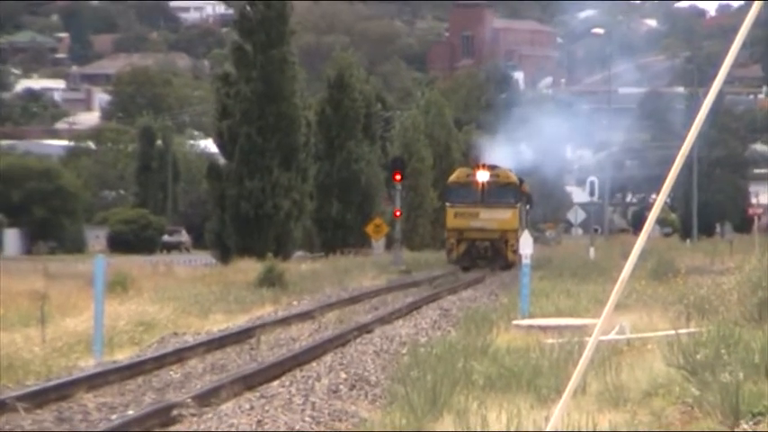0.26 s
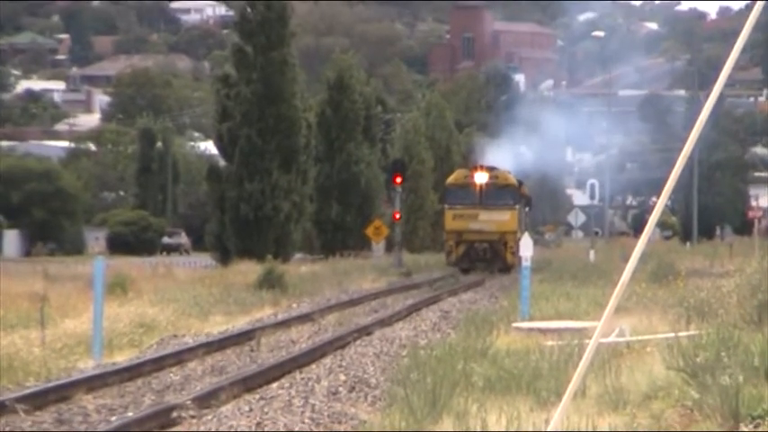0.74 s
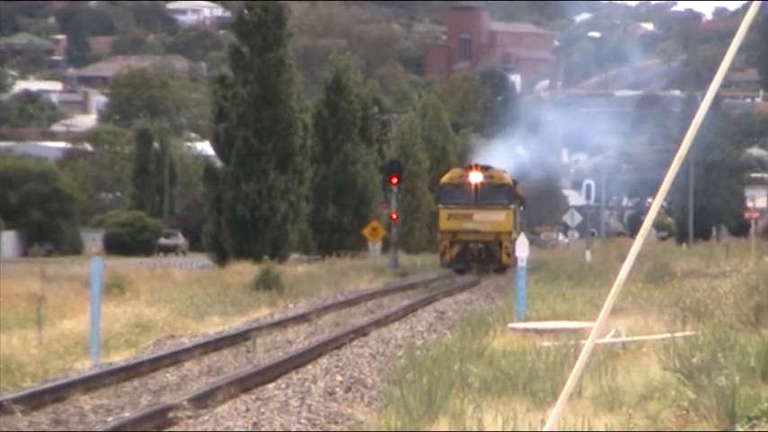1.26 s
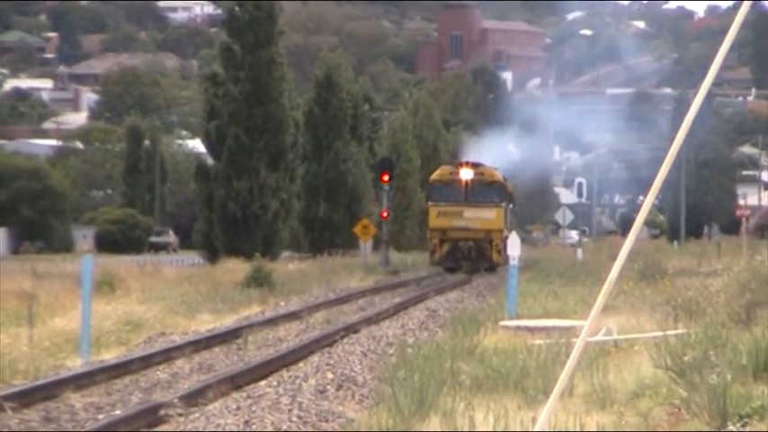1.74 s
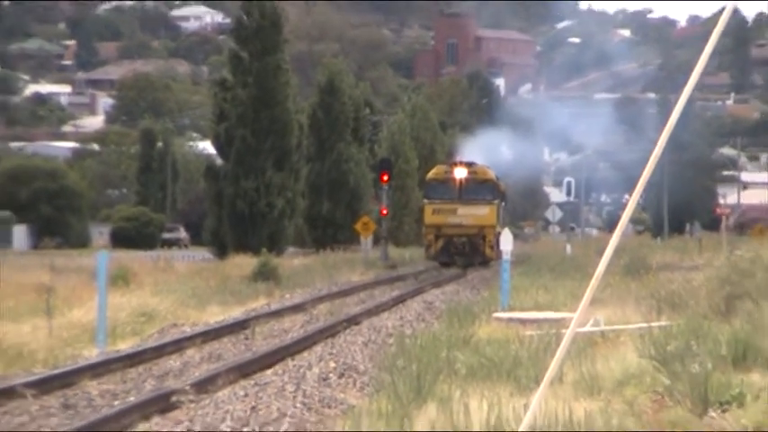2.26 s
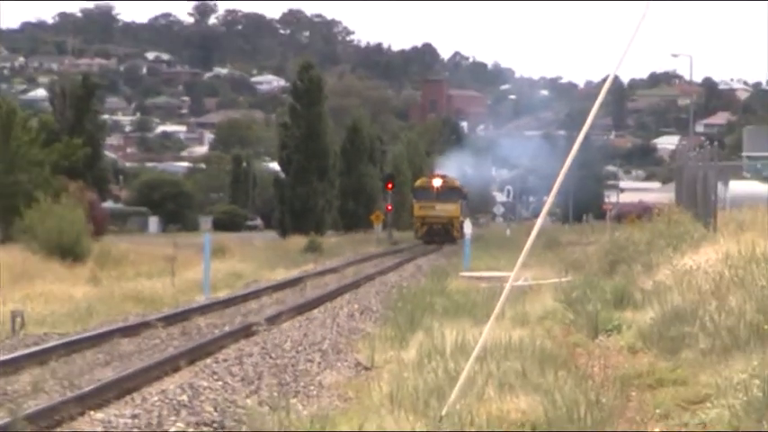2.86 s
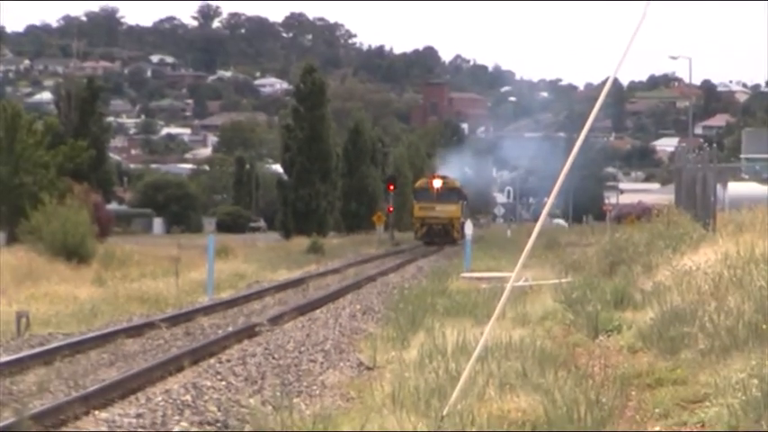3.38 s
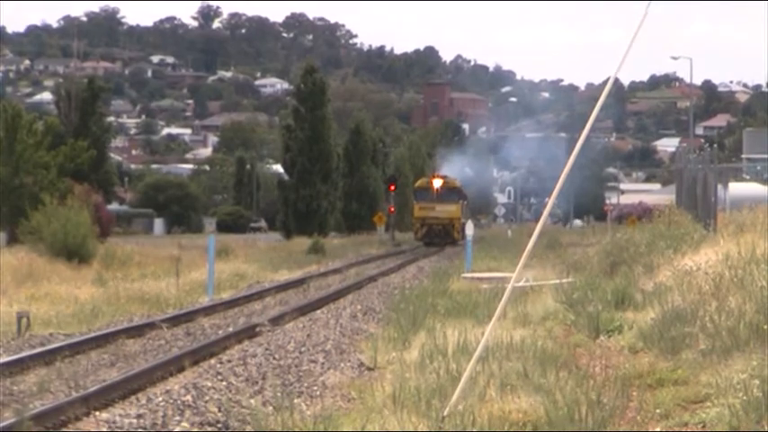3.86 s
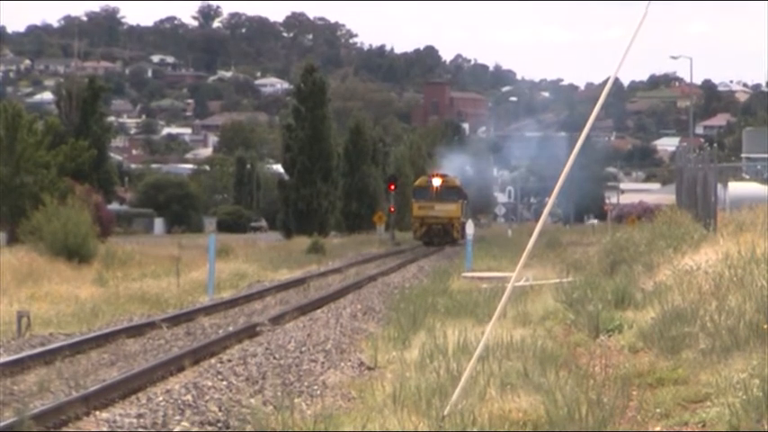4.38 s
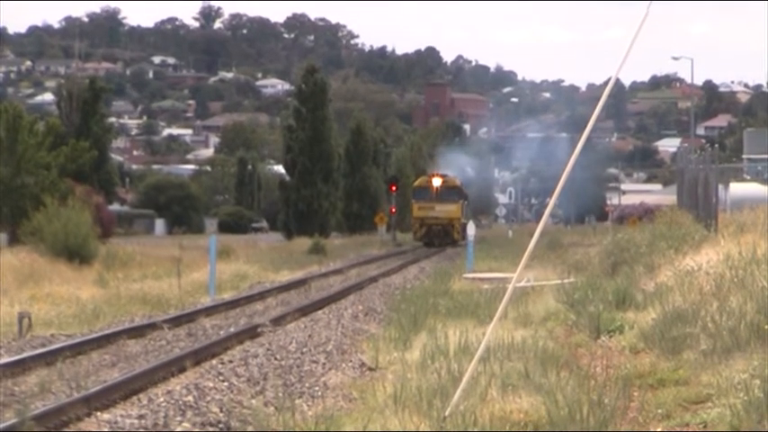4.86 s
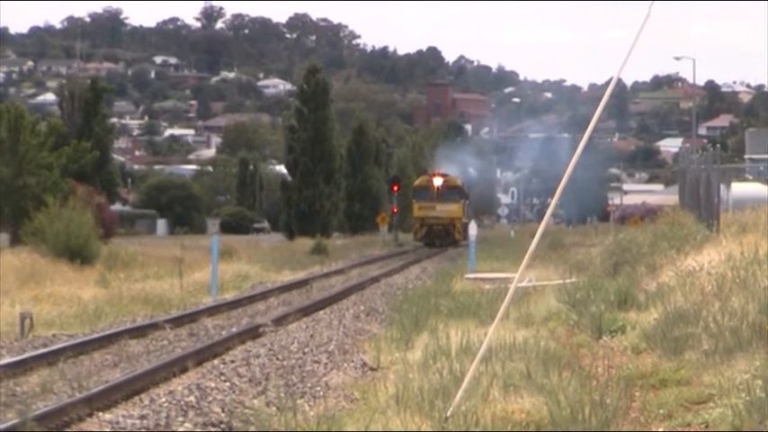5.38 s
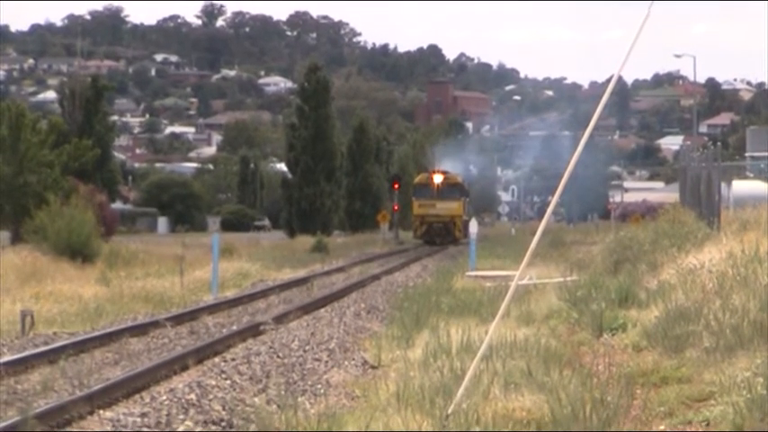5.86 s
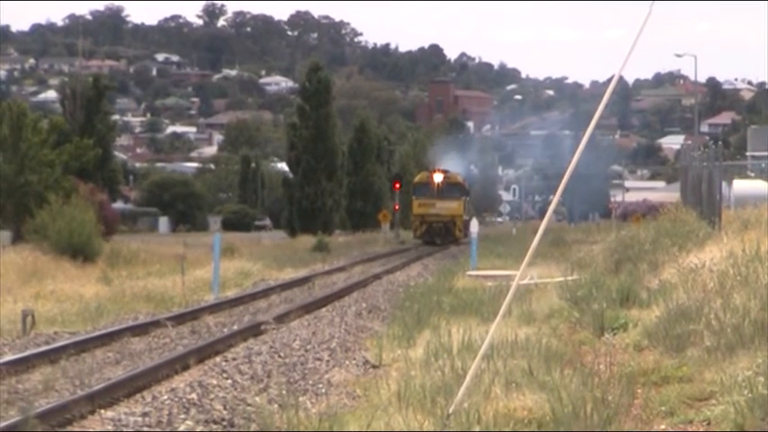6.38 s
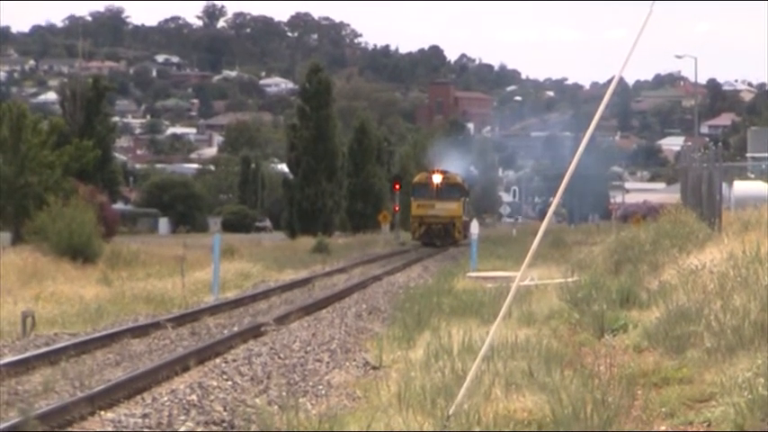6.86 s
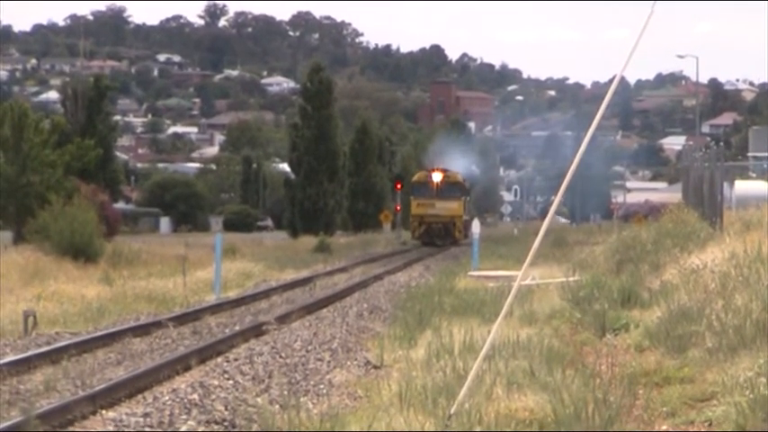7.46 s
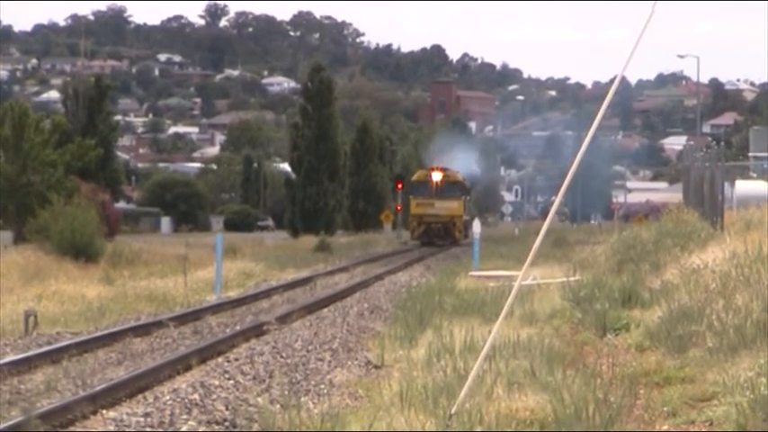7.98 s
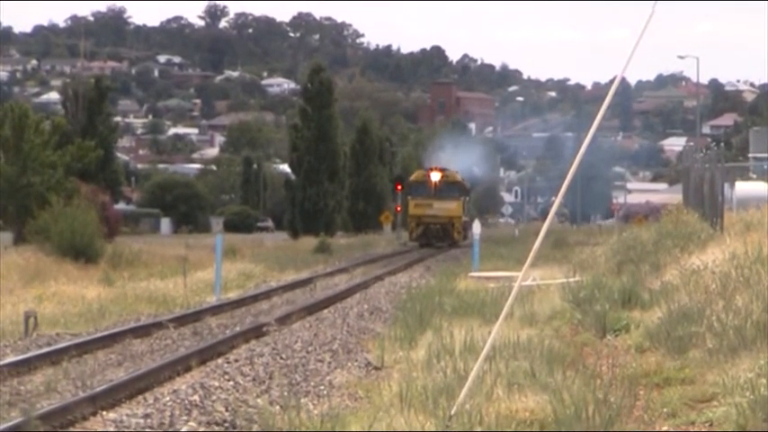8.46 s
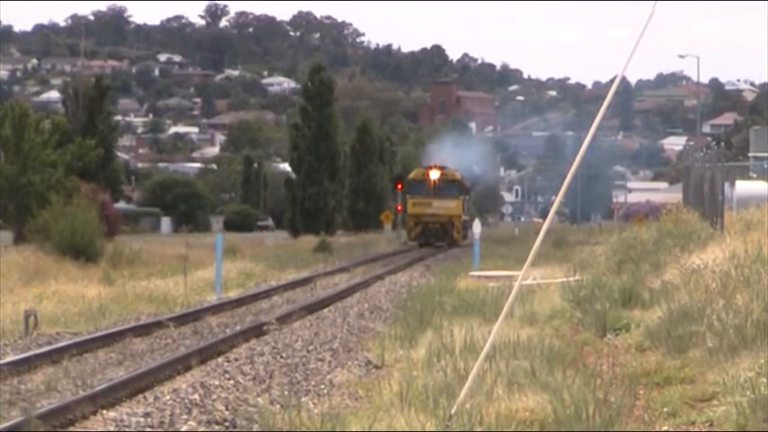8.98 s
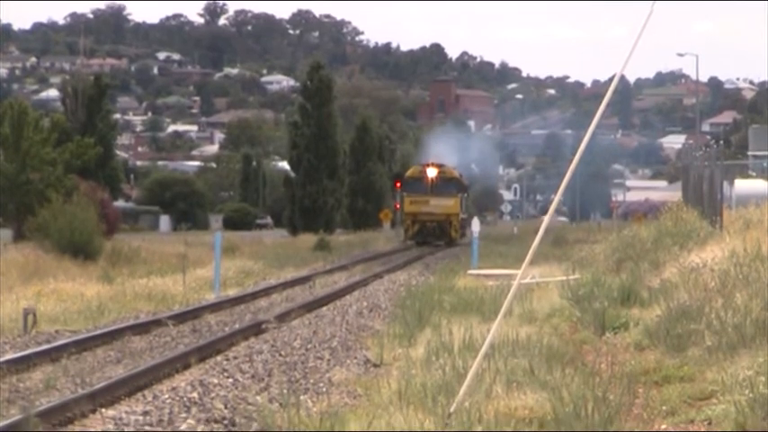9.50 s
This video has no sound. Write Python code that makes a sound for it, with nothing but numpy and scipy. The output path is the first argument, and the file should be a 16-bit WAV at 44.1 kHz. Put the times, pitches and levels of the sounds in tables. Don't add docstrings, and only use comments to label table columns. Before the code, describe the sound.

Faint insect chirring and light wind, then a growing throbbing diesel roar, broken by a single second-long chordal train horn and short echoes.

```python
import sys
import numpy as np
from scipy import signal
from scipy.io import wavfile
from scipy.ndimage import uniform_filter1d

SR = 44100
rng = np.random.default_rng(int(sys.argv[2]) if len(sys.argv) > 2 else 0)


def to_wav(sig):
    pcm = np.clip(np.atleast_2d(sig), -1, 1) * 32767
    pcm = np.round(pcm).astype(np.int16)
    wavfile.write(sys.argv[1], SR, pcm.T)


def volts_from_db(level):
    exponent = np.asarray(level, float) / 20
    return 10 ** exponent


N = 429093


def in_time(rows):
    s, *columns = np.transpose(rows)
    return [np.interp(np.arange(N) / SR, s, c) for c in columns]


def at_hz(points, hz, column=1):
    points = np.array(points)
    return np.interp(np.log(hz), np.log(points[:, 0]), points[:, column])


def rms_one(x):
    return x / np.sqrt(np.mean(x ** 2) + 1e-20)


def drift(rate):
    r = np.exp(-80 * np.pi * rate / SR)
    coarse = rng.standard_normal(N // 40 + 2002)
    slow = signal.lfilter([1], [1, -2 * r, r * r], coarse)[2000:]
    return np.interp(np.arange(N) / 40, np.arange(len(slow)), rms_one(slow))


def pan(x, left_db, count=2):
    left, right = x * volts_from_db(np.array([[left_db], [-left_db]]) / 2)
    return np.array([left, np.roll(right, count)])


def noise(colour, low_hz, high_hz, patchy_db, count=2):
    # f/Hz, likeness when far (-1 to 1), likeness when near
    likeness = [(30, -.3, .3), (60, .1, .8), (120, .55, .85), (300, .65, .92), (1000, .6, .9),
                (2000, .5, .87), (4000, .6, .65), (8000, .5, .75), (12000, .5, .85), (15500, .4, .8)]
    # f/Hz, left minus right/dB
    balance = [(60, -1), (110, -9), (200, -0.5), (380, -1.5), (700, -1.5), (1290, -1), (2380, -0.5),
               (4400, 0.5), (8120, 1.5), (15000, -5.5)]
    bands = int(np.ceil(4 * np.log2(high_hz / low_hz)))
    edges = np.geomspace(low_hz, high_hz, bands + 1)
    near = (np.arange(N) / N) ** 2
    white, out = rng.standard_normal((2, 2, N)), 0
    for k, (low, high) in enumerate(zip(edges, edges[1:])):
        band = signal.butter(2, [low, high], "band", fs=SR, output="sos")
        mid, side = signal.sosfilt(band, white[k % 2])
        hz = np.sqrt(low * high)
        alike = at_hz(likeness, hz) * (1 - near) + at_hz(likeness, hz, column=2) * near
        alike = np.clip(alike, -1, 1)
        pair = np.sqrt(1 + alike) * mid + np.sqrt(1 - alike) * side * [[1], [-1]]
        sides = volts_from_db(at_hz(balance, hz) / 2 * np.array([[1], [-1]]))
        out = out + volts_from_db(at_hz(colour, hz) + patchy_db * drift(6.5)) * pair * sides
    out = pan(out, 0, count=count)
    return out / np.sqrt(np.mean(out.mean(axis=0) ** 2))


def roar_rise():
    # t/s, level/dB
    loudness = [
        [(0, -55), (1.6, -54.5), (2.2, -52), (3.6, -47.5), (4.8, -45), (6.28, -41.5)],
        [(7.75, -32.5), (8.2, -33), (9.0, -30.5), (9.73, -30)],
    ]
    return in_time(loudness[0] + loudness[1])[0] + 52


def wind():
    # t/s, level/dB
    gusts = [(0.0, -37), (0.24, -60), (0.54, -33.5), (0.68, -48), (1.49, -43.5), (1.51, -47), (5.39, -50),
             (5.44, -59), (5.5, -47.5), (7.83, -45), (9.68, -47), (9.73, -31)]
    # f/Hz, level/dB per Hz
    rumble_colour = [(8.8, -45), (15, -19), (54, -5.5), (81, -11.5), (89, -12), (95, 0), (120, -30),
                     (210, -120)]
    return volts_from_db(in_time(gusts)[0]) * noise(rumble_colour, 13, 89.7, patchy_db=-1.0)


def song(hz, width_hz, steady=1.9):
    turn = 2 * np.pi * np.cumsum(hz * np.ones(N)) / SR
    return rms_one((steady + drift(width_hz)) * np.cos(turn) + drift(width_hz) * np.sin(turn))


def insects():
    # t/s, level/dB
    swell = [
        [(0.0, -58), (2.29, -48), (2.9, -47), (3.92, -45.5), (6.28, -44.5)],
        [(7.6, -43.5), (7.84, -41), (8.2, -43), (8.21, -41.5), (9.73, -40)],
    ]
    # f/Hz, level/dB per Hz
    chorus_colour = [(1590, -43), (2700, -13), (2890, -13), (2950, -9.5), (3330, -10), (3520, -1.5),
                     (3680, -1), (3780, -21.5), (4720, 3), (5160, -10.5), (5710, -16.5), (5900, -18),
                     (7670, -48), (13000, -120)]
    # t/s, song f/Hz, level/dB
    nearest = [(0, 3520, -64), (1.2, 3510, -65.5), (2.2, 3570, -45.5), (3.0, 3560, -50),
               (3.43, 3540, -46.5), (4.49, 3550, -40), (4.75, 3560, -52), (5.1, 3580, -46),
               (6.07, 3590, -41.5), (6.28, 3570, -63)]
    # t/s, song f/Hz, level/dB
    neighbour = [(0, 4714, -51), (.9, 4680, -59), (1.6, 4680, -64), (4.3, 4720, -45), (6.28, 4690, -46)]
    # song f/Hz, width/Hz, level/dB, left minus right/dB
    choir = [(3030, 6.6, -57.5, 2), (3060, 23, -56, 1), (3264, 28, -56, -3), (3380, 8.2, -52.5, 10),
             (3625, 8.9, -63, -7), (3810, 11, -59.5, 1), (3960, 13, -57, -4), (4125, 22, -52.5, -8),
             (4280, 5.9, -58.5, -1), (4580, 20, -52.5, -1), (4890, 27, -57, -8), (5080, 12, -56.5, -6),
             (5200, 13, -73, -6), (5430, 8.7, -58.5, 6), (5700, 16, -64.5, 12)]
    chorus_db, = in_time(swell[0] + swell[1])
    out = volts_from_db(chorus_db - 0.5) * noise(chorus_colour, 2810, 5620, patchy_db=0.6)
    hz, db = in_time(nearest + [(7.6, 3500, -50)])
    whine = volts_from_db(db - 4) * song(hz, 35, steady=2.4)
    overtone = volts_from_db(db - 19) * song(1.9 * hz, 200, steady=0)
    out += pan(whine + overtone, .6)
    hz, db = in_time(neighbour + [(7.6, 4890, -51)])
    out += pan(volts_from_db(db - 4) * song(hz, 130, steady=.3), -1)
    swell_db = np.minimum(chorus_db + 43.5, 0)
    for hz, width_hz, db, left_db in choir:
        level = volts_from_db(db + swell_db - 5 + 3.6 * drift(1.3))
        out += pan(level * song(hz * (1 + .003 * drift(.5)), 1.8 * width_hz, steady=1.2), left_db)
    return out


def leaves():
    # t/s, level/dB
    gusts = [(0, -76.5), (1.9, -74.5), (4.1, -71.5), (5.6, -70), (6.0, -66.5), (6.4, -67.5), (7.07, -66),
             (7.34, -64), (7.53, -64.5), (8.0, -59.5), (8.37, -65), (8.65, -59.5), (9.25, -63.5),
             (9.55, -56), (9.73, -57)]
    # f/Hz, level/dB per Hz
    leaf_colour = [(3290, -31), (5600, -1), (6100, -5), (8020, -11.5), (9270, -11), (15600, -41)]
    hiss_db, = in_time(gusts)
    top_db = -69.5 + .75 * np.maximum(hiss_db + 68, 0)
    top_db += .55 * np.maximum(roar_rise() - 10, 0)
    out = volts_from_db(hiss_db + 7.0) * noise(leaf_colour, 6150, 10960, patchy_db=0.9, count=1)
    return out + volts_from_db(top_db - 10.5) * noise(leaf_colour, 10800, 15700, patchy_db=.7)


def chips():
    # t/s, length/s, from f/Hz, to f/Hz, level/dB
    whistles = [(0.124, 0.058, 6100, 6150, -47.5), (.175, 0.046, 5830, 6260, -56),
                (.16, .025, 7200, 7200, -61), (0.706, .025, 5600, 5060, -55),
                (1.035, 0.046, 3400, 3080, -50), (1.245, 0.039, 5650, 5350, -56),
                (1.445, 0.045, 2970, 3530, -48), (2.007, .035, 5800, 5550, -52),
                (5.359, 0.033, 5920, 5740, -49), (7.557, 0.16, 1280, 1330, -38),
                (8.29, .05, 6200, 6100, -47)]
    out = np.zeros((2, N))
    for s, length, from_hz, to_hz, db in whistles:
        size = round(length * SR)
        glide_hz = np.linspace(from_hz, to_hz, size)
        tone = np.sin(2 * np.pi * np.cumsum(glide_hz) / SR) * np.hanning(size) ** .5
        rasp = uniform_filter1d(rng.standard_normal(size), size=60) * np.sqrt(20)
        tone *= 1 + (abs(to_hz - from_hz) > 250) * rasp
        left_db = -5.5 if s < .3 else -.5
        out[:, round(s * SR):][:, :size] += pan(np.sqrt(2) * volts_from_db(db) * tone, left_db)
    return out


def ticks():
    # t/s, peak level/dB, centre f/Hz, width/Hz, time to fall by 60 dB/s
    knocks = [(1.94, -40, 7000, 5000, .04), (3.352, -40, 9000, 9000, .012), (3.3705, -24, 3950, 450, .05),
              (3.3705, -31, 7000, 5500, .07), (3.610, -27, 520, 400, .15), (3.962, -50, 9000, 6000, .01),
              (3.974, -35, 11000, 8000, .02), (4.015, -50, 9000, 6000, .015), (9.195, -16, 900, 700, .03)]
    # t/s, left minus right/dB
    places = [(3.3, -1), (3.36, -5), (3.7, -2), (3.96, 3), (4.1, -1.5)]
    out, size = np.zeros((2, N)), 4000
    for s, db, hz, width_hz, t60 in knocks:
        left_db = np.interp(s, *np.transpose(places))
        shared, *own = rng.standard_normal((3, size))
        edges = [max(hz - width_hz / 2, 50), hz + width_hz / 2]
        band = signal.butter(2, edges, "band", fs=SR, output="sos")
        fade = volts_from_db(-60 * np.arange(size) / SR / t60)
        burst = signal.sosfilt(band, (shared + 0.56 * np.array(own)) * fade)
        out[:, round(s * SR):][:, :size] += pan(volts_from_db(db) * burst / np.abs(burst).max(), left_db)
    return out


def crank_angle():
    # t/s, turns per s/Hz
    speed = [(0, 14.12), (3, 14.2), (5.5, 14.29), (7.5, 14.27), (8.5, 14.17), (9.2, 14.05), (9.73, 13.96)]
    return 2 * np.pi * (np.cumsum(in_time(speed)[0]) / SR + .3)


def roar(crank):
    # f/Hz, level/dB per Hz
    roar_colour = [(53, -33), (90, -2.5), (128, -7), (182, -4.5), (230, -8.5), (274, -16.5), (445, -16.5),
                   (547, -19.5), (643, -22.5), (801, -16.5), (984, -23), (1380, -22), (1990, -23),
                   (2670, -28), (3000, -27), (3900, -57), (6600, -120)]
    # low f/Hz, high f/Hz
    registers = [
        (90, 280),
        (280, 700),
        (700, 1400),
        (1400, 2800),
    ]
    # level when far/dB, share of the rise
    register_gain = [(-46, 0.43), (-51.5, 0.69), (-51.5, 0.84), (-54.5, 0.82)]
    # t/s, rise/s, length/s, level/dB
    surges = [
        (4.9, .15, 0.58, 2),
        (9.047, 0.28, 1.1, 5.5),
    ]
    surge_share = (0.031, 0.81, 1.08, -0.031)
    t, rise_db, surge_db, out = np.arange(N) / SR, roar_rise(), 0, 0
    for s, rise, length, db in surges:
        surge_db = surge_db + db * np.clip(np.minimum(t - s, s + length - t) / rise, 0, 1)
    for (low_hz, high_hz), (db, share), part in zip(registers, register_gain, surge_share):
        level = volts_from_db(db + share * rise_db + part * surge_db)
        out = out + level * noise(roar_colour, low_hz, high_hz, patchy_db=.9)
    return out * (1 + 0.02 * np.cos(crank) + 0.077 * np.cos(8 * crank))


def exhaust(crank):
    # t/s, level/dB
    approach = [(0, -52.5), (1.5, -52.5), (3, -49.5), (4.4, -47.5), (5.3, -43), (6.3, -40.5), (7.0, -39),
                (7.6, -36), (8.2, -34), (9.0, -30.5), (9.73, -29.5)]
    # t/s, level over the leader/dB
    trailing = [(0, -6), (2.5, -2.5), (3.3, -9), (4.4, -1.5), (7.1, -2), (7.6, -12), (9.73, -20)]
    # t/s, firings behind (the tones add up at whole numbers)
    slip = [(0, -2.4), (1.33, 0), (2.27, 2), (2.9, 3), (4.45, 6), (5.83, 8), (7.33, 11), (9.73, 16)]
    # level over the loudness when far/dB, share of its rise, trailing engine's extra level/dB
    groups = [
        (6, 1.09, -5.4),
        (3.5, 0.81, -12),
        (1, 0.99, -9),
    ]
    # first crank order, levels of it and the next orders/dB
    near_firing = (7, [-25, 0, -11])
    near_tenth = (10, [0, -14, -19, -13])
    near_double = (14, [-14, -8, 0, -12, -22, -16, -15, -18, -24, -22, -19, -22, -19, -24, -19])
    (near_db,), (trail_db,), far_db = in_time(approach), in_time(trailing), -50
    behind = 2 * np.pi * in_time(slip)[0] / 8
    out = np.zeros(N)
    for (db, share, extra_db), (first, levels) in zip(groups, (near_firing, near_tenth, near_double)):
        gain = volts_from_db(far_db + db + share * (near_db - far_db))
        trail = volts_from_db(trail_db + extra_db)
        for order, rel_db in enumerate(levels, round(first)):
            turn = order * crank + .55 * (order - 8) ** 2 + .12 * drift(1.5)
            both = np.cos(turn) + trail * np.cos(turn - order * behind)
            out += gain * volts_from_db(rel_db + .8 * drift(3.0)) * both
    return pan(np.sqrt(2) * out, -2.5, count=26)


def horn():
    trumpet_hz = (405.25, 486.64, 579.2)
    # speaks at t/s, stops at t/s, sharp at the start (share of pitch), settling/s, dies at dB per s
    trumpets = [
        (6.385, 7.525, .016, .03, 550),
        (6.347, 7.512, .013, .028, 300),
        (6.345, 7.512, .014, .009, 650),
    ]
    reed_start = (.13, .197, .026)
    # level/dB, change as the ground echo shifts/dB per s
    low_tones = [(-26.5, 6), (-31.5, -2), (-49.5, 2), (-36.5, -1), (-45, -8), (-35.5, 7), (-38, -10),
                 (-47, -2), (-44.5, -1), (-46, .1), (-47.5, -2)]
    mid_tones = [(-28.5, -3.5), (-33.5, 1.5), (-25, -4), (-48, -8), (-37.5, 1), (-39, -7), (-44, 5),
                 (-42, 2.5), (-44, 4), (-52, -2), (-60, -5), (-64, 2)]
    high_tones = [(-31.5, -1), (-33, 2.5), (-25, 1.5), (-38.5, -1), (-48.5, -12), (-34, -5), (-31.5, 0),
                  (-46.5, -4), (-48.5, -0.5), (-65, 5), (-60.5, 3), (-58, 6), (-66, -1), (-66, -4)]
    # t/s, level/dB, brightness/dB per kHz
    blast = [(6.35, -2.1, 1.5), (6.5, -0.7, 0.2), (6.7, -2, 0.5), (6.85, -0.7, 0), (6.95, -.5, .5),
             (7.1, -.8, .5), (7.25, -0.2, 0.45), (7.48, 1.2, 0.05)]
    # delay/s, level/dB, left minus right/dB
    echo_paths = [(.031, -21.5, -1), (.043, -22.5, 3), (.072, -21, 1), (.095, -22, -3), (.118, -22, 1),
                  (.151, -22, 2), (.223, -22, -4.5), (0.297, -23, 1), (.37, -24, -2), (.46, -26, 2.5)]
    # f/Hz, level/dB per Hz
    reed_air = [(250, -14), (500, -14), (1200, -6), (2200, 13.5), (3500, -1), (4500, 9.5), (5500, -17),
                (9000, -35)]
    t, out = np.arange(N) / SR, np.zeros(N)
    blast_db, bright_db = in_time(blast)
    voices = zip(trumpet_hz, trumpets, reed_start, (low_tones, mid_tones, high_tones))
    for hz, (on, off, sharp, settle, fall_db), start, tones in voices:
        pitch = hz * (1 + sharp * np.exp(-np.maximum(t - on, 0) / settle) + .00007 * drift(9.0))
        turn = 2 * np.pi * (np.cumsum(pitch * (t > on - .05)) / SR + start)
        gate_db = -1500 * np.maximum(on + 0.0046 - t, 0) - fall_db * np.maximum(t - off, 0)
        for number, (db, slope_db) in enumerate(tones, 1):
            path_db = slope_db * (t - 6.95) + bright_db * number * hz / 1000 + 0.74 * drift(5.3)
            bloom_db = -25 * number * (pitch / hz - 1)
            level = volts_from_db(db + blast_db + gate_db + path_db + bloom_db)
            out += level * np.cos(number * turn + .7 * number ** 2)
    out *= np.sqrt(2)
    dull = signal.sosfilt(signal.butter(2, 1500, fs=SR, output="sos"), out)
    echoes = 0
    for s, db, left_db in echo_paths:
        broken = volts_from_db(db + 3 * drift(18))
        echoes = echoes + pan(np.roll(dull, round(s * SR)) * broken, left_db)
    rush = volts_from_db(-40 + gate_db) * noise(reed_air, 300, 8700, patchy_db=1.5)
    return pan(out, -2.75, count=1) + echoes + rush


def scene():
    crank = crank_angle()
    surroundings = wind() + insects() + leaves() + chips() + ticks()
    return surroundings + roar(crank) + exhaust(crank) + horn()


def roll_off(x):
    return signal.sosfilt(signal.butter(12, 15710, fs=SR, output="sos"), x)


def record(dry):
    mix = dry + volts_from_db(-72) * rng.standard_normal(dry.shape)
    return roll_off(mix)


dry = scene()
out = record(dry)
to_wav(out)
```